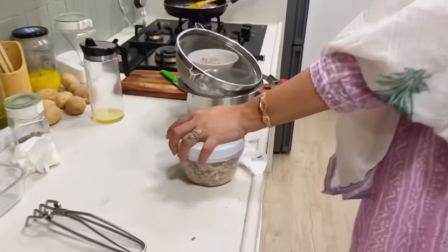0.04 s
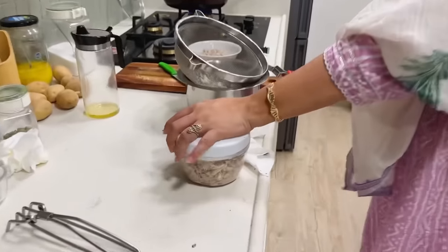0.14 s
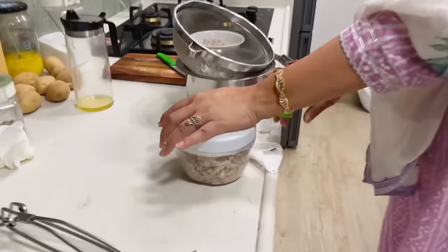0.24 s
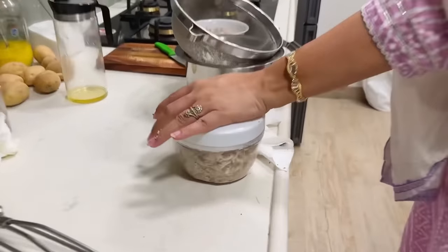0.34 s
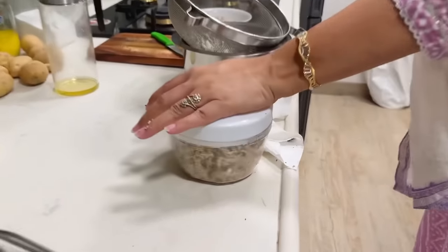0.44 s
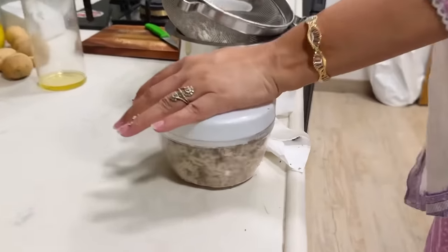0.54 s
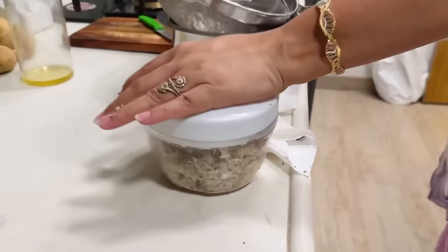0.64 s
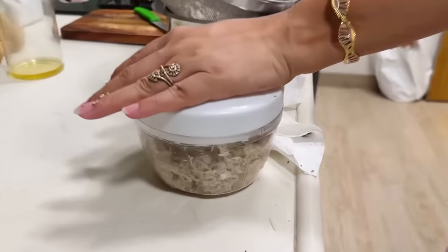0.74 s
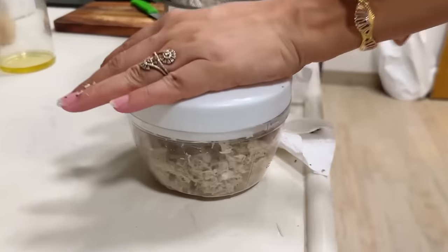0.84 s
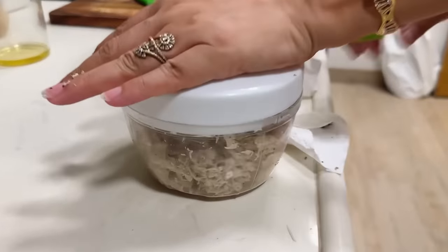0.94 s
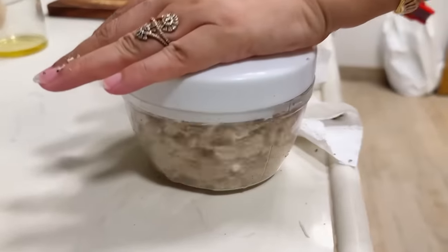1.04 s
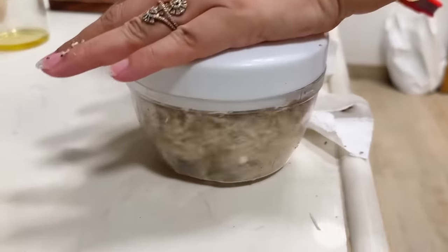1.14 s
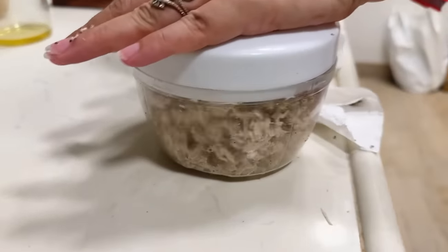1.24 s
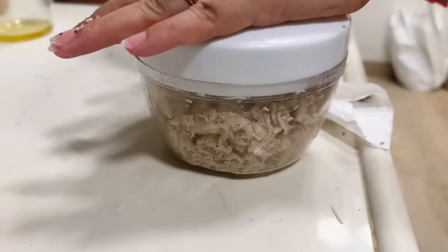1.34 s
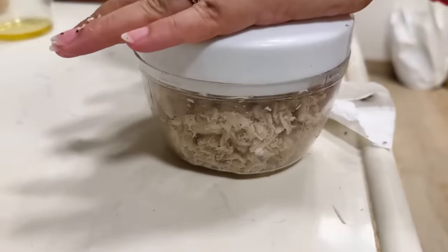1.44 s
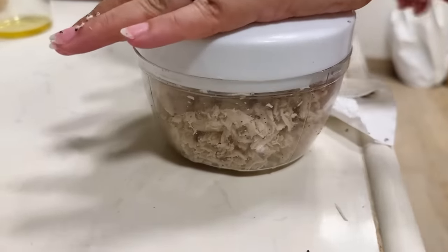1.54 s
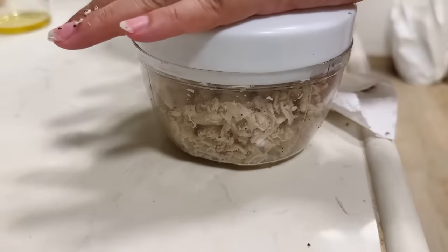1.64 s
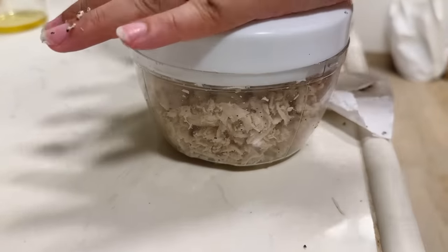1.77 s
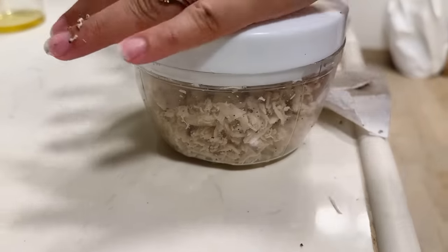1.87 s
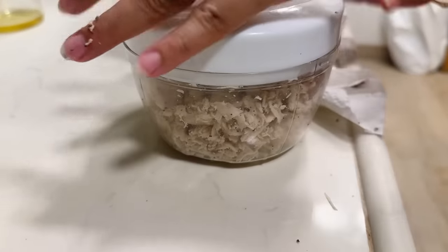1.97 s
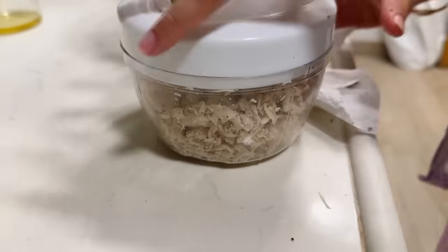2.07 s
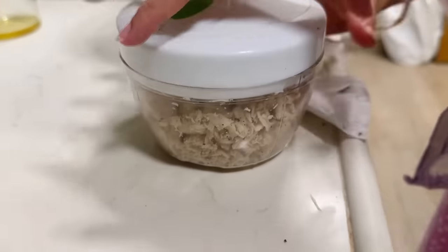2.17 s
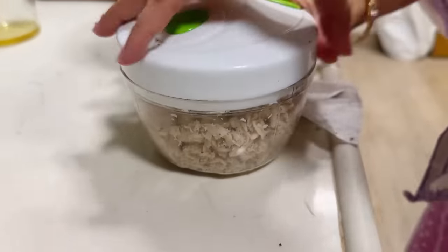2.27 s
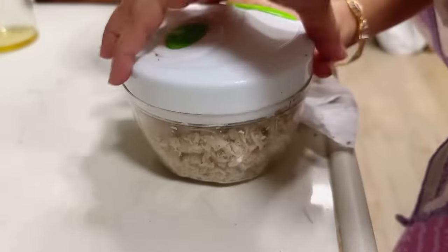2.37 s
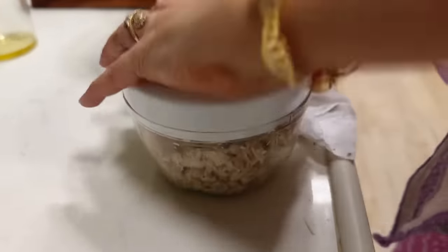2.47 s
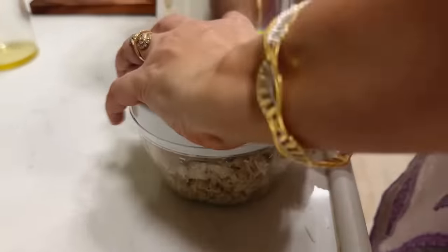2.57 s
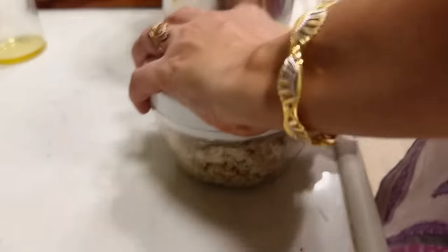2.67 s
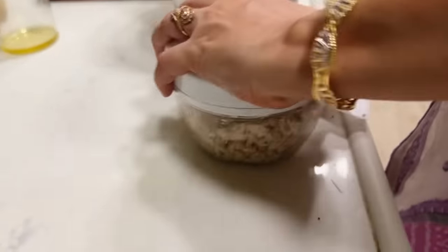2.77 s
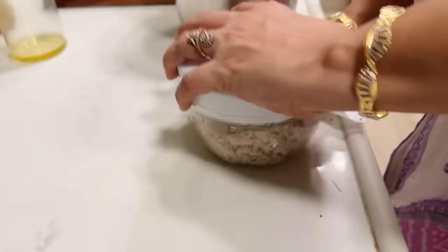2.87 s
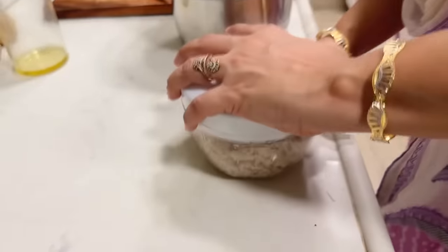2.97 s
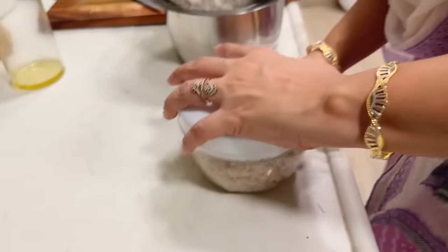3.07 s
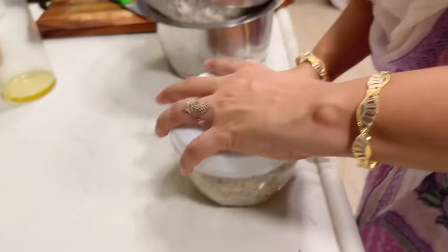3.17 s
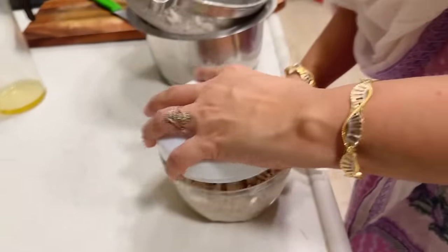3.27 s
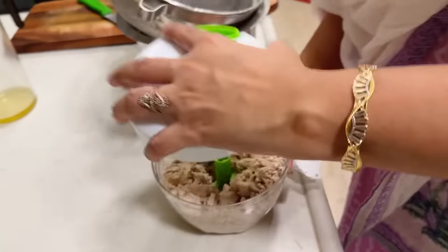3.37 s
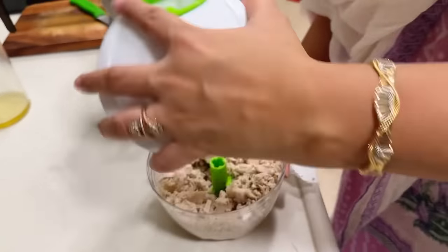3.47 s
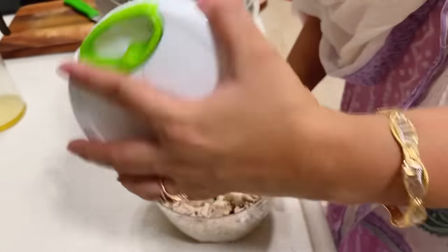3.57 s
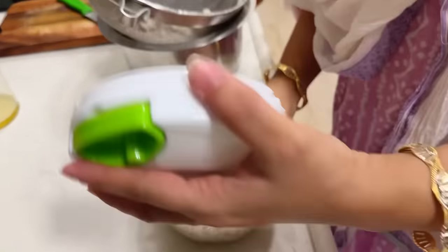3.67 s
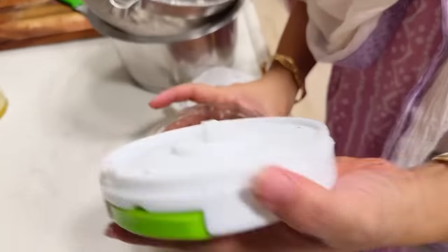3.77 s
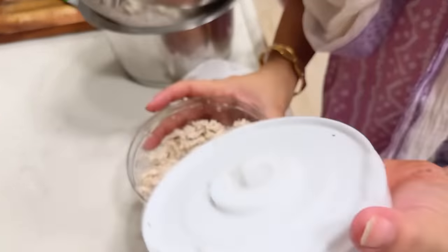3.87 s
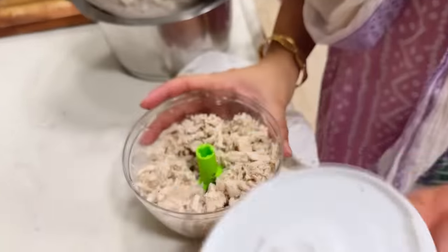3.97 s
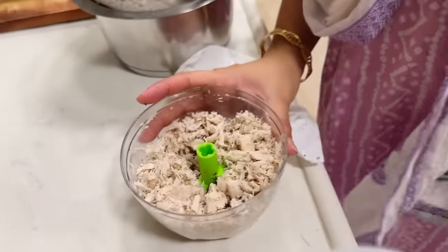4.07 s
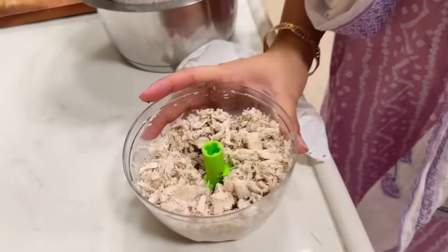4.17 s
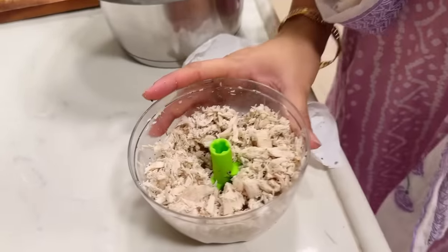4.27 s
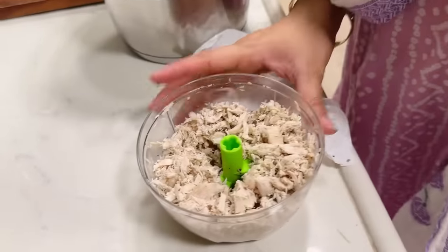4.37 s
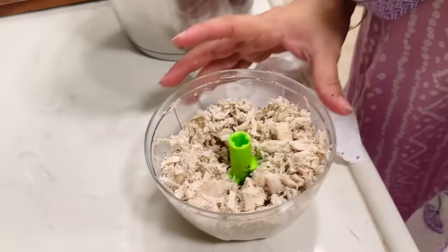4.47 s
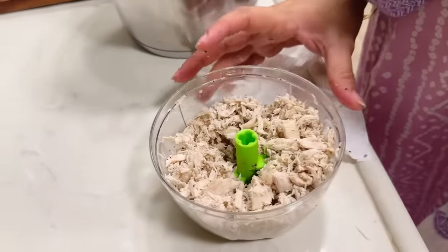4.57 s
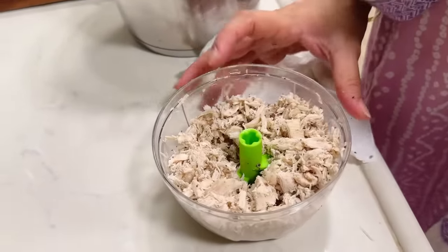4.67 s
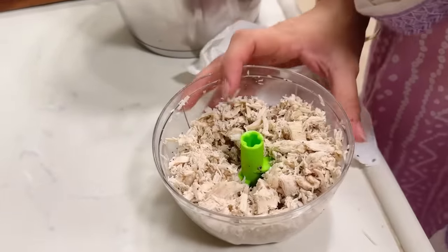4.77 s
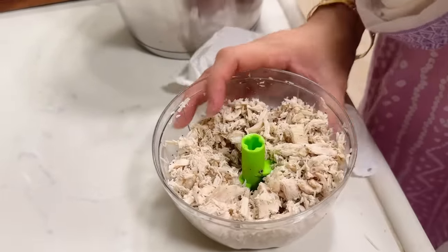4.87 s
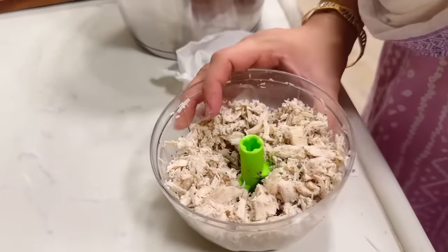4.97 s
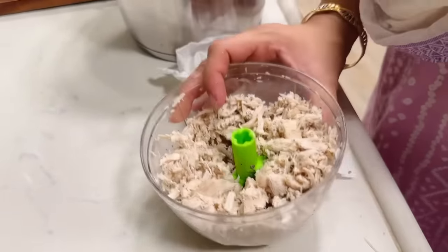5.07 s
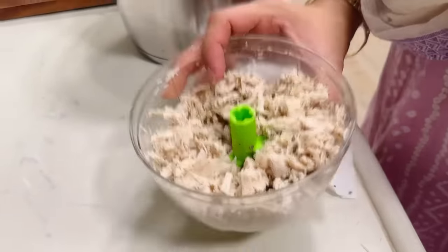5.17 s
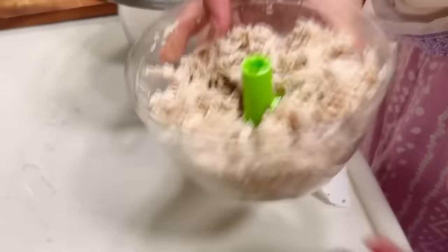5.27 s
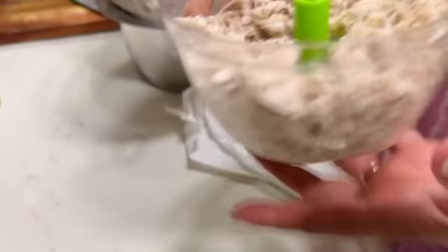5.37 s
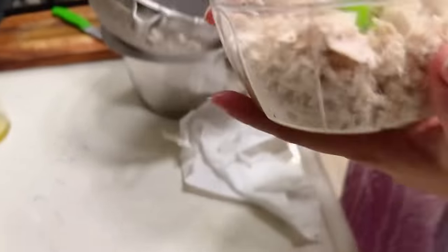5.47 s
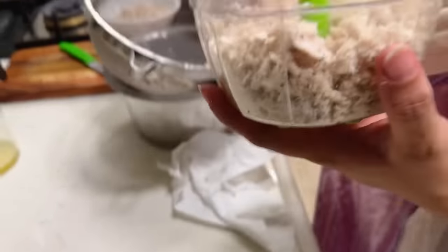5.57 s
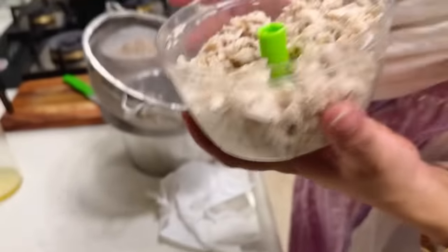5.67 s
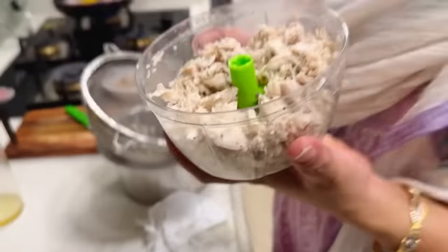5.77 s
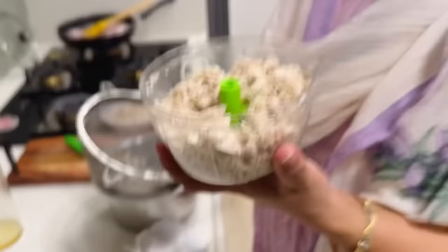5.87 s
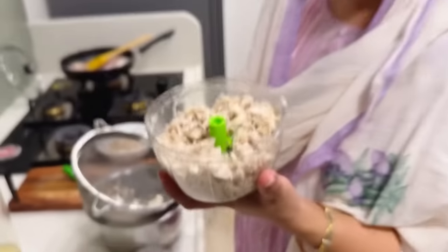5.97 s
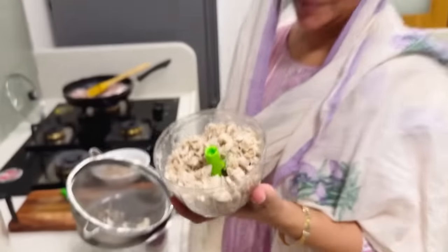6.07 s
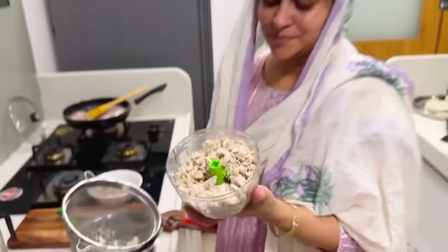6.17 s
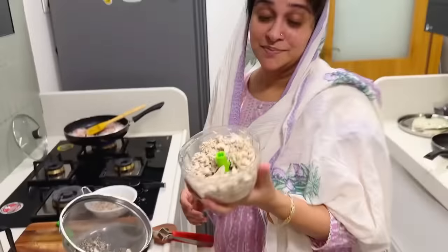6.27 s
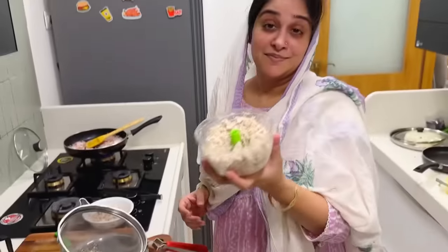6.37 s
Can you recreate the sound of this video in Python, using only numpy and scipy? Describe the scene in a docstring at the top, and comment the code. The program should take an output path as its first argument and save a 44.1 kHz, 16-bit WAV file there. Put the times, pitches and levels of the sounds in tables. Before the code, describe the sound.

Close to a phone microphone in a small, hard kitchen, a pull-cord plastic chopper shreds cooked chicken in three quick pulls. The cord rasps, the blades slap the meat and the spool rattles back, until the handle snaps home. The lid twists off with faint clicks and lands with a loud, hollow clack. The bowl knocks and drags on the counter, then clothes rustle softly over a faint appliance hum.

```python
"""A pull-cord plastic chopper shreds cooked chicken on a kitchen counter, close to a phone.
Three pulls spin the blades, which slap the meat; a spring rattles the cord back in, and at last the
handle snaps home. The lid is twisted off and put down with a hard clack, the bowl knocks and drags
as it is picked up, clothes rustle. An appliance hums faintly in the small, hard room."""
import sys
import numpy as np
from scipy import signal
from scipy.fft import rfft, irfft
from scipy.io import wavfile

SR = 44100
rng = np.random.default_rng(int(sys.argv[2]) if len(sys.argv) > 2 else 0)


def digitize_waveform(pressure):
    """Quantize a signal to 16-bit integers and store it at the path in sys.argv[1].

    Rows of a 2-D input are taken as channels; values are limited to [-1, 1].
    """
    field = np.atleast_2d(pressure).T
    bounded = np.clip(field, -1, 1)
    quanta = np.round(bounded * 32767).astype(np.int16)
    wavfile.write(sys.argv[1], SR, quanta)


N = 283286
T = np.arange(N) / SR
HIT_T = T[:SR // 3]
TOP_HZ = 16000

# cord pulls (start [s], run-up [s], meat level [dB], relative cord level [dB])
PULLS = [(-.02, 0.13, -36.5, -47), (0.593, 0.13, -34, -44.5), (1.275, 0.085, -30.5, -43.5)]
# shredding spectrum (frequency [Hz], gain [dB])
MEAT_SPECTRUM = [(50, -21), (120, -12.5), (220, 0.5), (350, 2), (700, -3.5), (1000, -11), (1400, 1),
                 (2200, -10), (3500, -21.5), (6000, -18), (10000, -39), (16000, -65)]
# housing resonances (frequency [Hz], width [Hz], gain [dB])
HOUSING_MODES = [(350, 50, 0), (506, 40, -3), (845, 160, 1), (1290, 140, -6), (1600, 380, 1.5),
                 (1980, 200, -3), (2375, 120, -3), (2970, 400, -4), (3700, 500, -3)]
# large chunks caught by a blade (time [s], level [dB], pitch [Hz])
CHUNKS = [(0.083, -32.5, 1220), (0.129, -39, 515), (0.712, -38, 394), (0.734, -34.5, 790),
          (1.252, -46, 745), (1.338, -29, 680), (1.347, -28.5, 960), (1.383, -30.5, 515),
          (1.46, -30.5, 605), (1.481, -37, 1240), (1.683, -42.5, 680)]
PULL_HOLD_S, COAST_DB_PER_S, MEAT_EXPONENT = 0.018, 102, 0.86


def chopping():
    """Blades tear through shreds of meat in quick flurries, fading as the meat slows them."""
    flurry = undb(2.5 * walk(150))
    shreds = (grains(500, spread_db=1) + 1.5 * grains(3000, spread_db=0)) * flurry
    meat = unit(body(colour(shreds, MEAT_SPECTRUM), HOUSING_MODES[:3]))
    out = np.zeros(N)
    for s, rise_s, meat_db, _ in PULLS:
        speed = spin(s, rise_s, PULL_HOLD_S, COAST_DB_PER_S)
        out += meat * undb(meat_db) * speed ** MEAT_EXPONENT + blades(speed, meat_db - 2)
    for s, db, hz in CHUNKS:
        add(out, s, blow(slap(hz), db))
    return out


def blades(speed, db, top_rate_hz=91.55, median_hz=623, spread_octaves=.75, jitter_s=.0012):
    """Each blade pass flings a piece of a different size against the bowl."""
    pass_count = np.cumsum(top_rate_hz * np.sqrt(speed)) / SR
    passes = np.flatnonzero(np.diff(np.floor(pass_count)))
    out = np.zeros(N)
    for i, (smallness, strength, lateness) in zip(passes, rng.standard_normal((64, 3))):
        hz = median_hz * 2 ** (spread_octaves * np.clip(smallness, -1.5, 2))
        hit = speed[i] ** MEAT_EXPONENT * blow(slap(hz), db + 3 * strength)
        add(out, max(i / SR + lateness * jitter_s, 0), hit)
    return out


def slap(hz, decay_cycles=2.1):
    """A wet, quickly damped blow on meat; smaller pieces sound higher."""
    return np.sin(2 * np.pi * hz * HIT_T) * np.exp(-HIT_T * hz / decay_cycles)


# cord rasp spectrum (frequency [Hz], gain [dB])
CORD_SPECTRUM = [(2500, -1), (4500, -4), (7000, -12), (9000, -8), (10400, -6), (16000, -10.5)]
# whistling bands of the taut cord (frequency [Hz], width [Hz], gain [dB])
CORD_BANDS = [(8130, 260, 10), (9700, 400, 12)]
# cord whips (time [s], level [dB])
WHIPS = [(0.908, -33), (1.076, -41), (1.328, -38)]


def pull_cord():
    """The cord rasps through its eyelet, louder with speed, and whips three times."""
    fibres = grains(9000, spread_db=1) * undb(2.5 * walk(180))
    rasp = unit(body(colour(fibres, CORD_SPECTRUM), CORD_BANDS)) * undb(6.5)
    out = np.zeros(N)
    for s, rise_s, _, db in PULLS:
        out += rasp * undb(db) * spin(s, rise_s, PULL_HOLD_S, COAST_DB_PER_S) ** 0.78
    for s, db in WHIPS:
        add(out, s, blow(band(contact(0.059, chatter=4.7), 9400, 2600), db))
    return out


# spindle glide (time [s], pitch [Hz], level [dB])
WHINE = [(1.275, 600, -52), (1.3, 820, -43), (1.33, 1130, -39), (1.365, 1330, -39), (1.41, 1040, -43),
         (1.47, 800, -50), (1.525, 630, -42), (1.56, 480, -56)]


def spindle_whine(roughness=0.06):
    """On the hardest pull the spindle sings hoarsely, rising then falling."""
    s, hz, db = np.transpose(WHINE)
    pitch_hz = np.interp(T, s, hz) * (1 + roughness * walk(400))
    gain = np.interp(T, s, undb(db), left=0, right=0) * undb(3.5 * walk(180))
    return np.sqrt(2) * np.sin(2 * np.pi * np.cumsum(pitch_hz) / SR) * gain


# spool rewinds (start [s], run-up [s], hold [s], level [dB])
REWINDS = [(.19, 0.27, 0.026, -35.5), (.87, 0.22, 0.031, -31), (1.53, 0.12, 0.068, -48)]
# spindle idling between pulls (start [s], length [s], level [dB])
IDLING = [(.5, 0.17, -59.5), (1.18, 0.15, -47)]
# spool scrape spectrum (frequency [Hz], gain [dB])
SPOOL_SPECTRUM = [(60, -0.5), (180, 4.5), (350, 5), (800, 2.5), (1500, -3), (2400, -3.5), (3500, -9.5),
                  (5000, -8), (8000, -11), (11000, -14.5), (16000, -21)]


def rewinding(tooth_hz=118, decay_teeth=0.9, brake_db_per_s=208):
    """The spring spins the spool back, its catch scraping unevenly over the teeth; the spindle idles."""
    tooth_phase = np.cumsum(tooth_hz * (1 + 0.051 * walk(65))) / SR % 1
    scrape = grains(3000, spread_db=0) * (2.1 + np.exp(-tooth_phase / decay_teeth))
    gain = sum(undb(db) * spin(s, rise_s, hold_s, brake_db_per_s) for s, rise_s, hold_s, db in REWINDS)
    idle = unit(colour(grains(4000, spread_db=1), SPOOL_SPECTRUM)) * rubs(IDLING)
    return unit(body(colour(scrape, SPOOL_SPECTRUM), HOUSING_MODES)) * gain + idle


# housing knocks (time [s], level [dB], chatter t60 [s], favoured tone [Hz], treble [dB])
KNOCKS = [(.277, -22.5, 0.067, 784, -4.5), (.312, -34.5, 0.033, 800, -14), (.396, -26, 0.099, 856, -10),
          (.409, -26.5, 0.17, 1300, -11), (0.459, -23.5, 0.028, 1200, 0.5), (0.475, -19.5, 0.012, 810, -5),
          (.481, -24, 0.087, 1710, -5), (.628, -39, 0.099, 1347, -11), (0.904, -32, 0.03, 900, -9),
          (0.9079, -21, 0.035, 510, -7), (.911, -18.5, 0.043, 1670, -2.5), (1.011, -32, 0.015, 1000, -6),
          (1.028, -24.5, 0.033, 840, -16), (1.032, -19, 0.11, 1320, 1.5), (1.063, -30, 0.025, 870, -10),
          (1.1, -23.5, 0.066, 1600, -3), (1.1157, -18.5, 0.012, 990, -1), (1.1301, -16.5, 0.048, 1570, -10),
          (1.173, -32, 0.032, 850, -7), (1.269, -39, 0.049, 1752, -27), (2.093, -48.5, 0.018, 1420, 15),
          (2.246, -51, 0.012, 1300, 1), (4.446, -48.5, 0.038, 1350, -1)]
# knock spectrum (frequency [Hz], gain [dB])
KNOCK_SPECTRUM = [(60, -28), (200, -15), (400, -3), (800, 0), (1400, 0), (2200, -1), (3300, -8),
                  (4200, -14), (5000, -19), (9000, -22), (16000, -30)]
# dry cracks of the hardest knocks (time [s], level [dB])
CRACKS = [(.475, -35), (1.0325, -31), (1.1149, -27), (1.1294, -28)]
# crack spectrum (frequency [Hz], gain [dB])
CRACK_SPECTRUM = [(500, -16), (1100, -4), (1650, 2), (2400, -2), (3200, -3), (4000, -4), (5000, -18),
                  (16000, -28)]


def knocks(scatter_db=6, tone_db=3.5):
    """Spool, catch and lid strike the housing; each lands elsewhere and wakes its modes differently."""
    out = np.zeros(N)
    for s, db, t60_s, tone_hz, treble_db in KNOCKS:
        modes = [(hz, width_hz, mode_db + scatter_db * rng.standard_normal())
                 for hz, width_hz, mode_db in HOUSING_MODES]
        push = colour(contact(t60_s, chatter=6.2), KNOCK_SPECTRUM)
        push = colour(push, [(1800, 0), (4000, treble_db)])
        push = body(push, [(tone_hz, tone_hz / 2, tone_db)])
        add(out, s, blow(body(push, modes), db))
    for s, db in CRACKS:
        add(out, s, blow(colour(contact(0.0032, chatter=1), CRACK_SPECTRUM), db))
    return out


# handle impacts (time [s], level [dB], spring level [dB], top treble [dB])
SNAPS = [(1.7405, -20.5, -48, -17), (1.7542, -14.5, -36, -2), (1.7628, -15.5, -37, 3),
         (1.7664, -16, -29, 8), (1.7769, -17.5, -30, -13)]
# impact spectrum (frequency [Hz], gain [dB])
SNAP_SPECTRUM = [(60, -22), (170, -7.5), (400, 0), (700, 2), (1300, .5), (2000, .5), (3000, -5),
                 (5000, -11.5), (8000, -11.5), (16000, -19)]
# handle resonances (frequency [Hz], width [Hz], gain [dB])
HANDLE_MODES = [(506, 30, -2), (1260, 45, -1), (1590, 50, -1), (1805, 40, 0), (1954, 40, -1), (4860, 60, 1),
                (5210, 60, 2), (5502, 120, -4), (6718, 120, -3), (7122, 70, 1)]
# coil spring resonances (frequency [Hz], width [Hz], gain [dB])
SPRING_MODES = [(2272, 120, -7), (3451, 250, -6), (4296, 200, -7), (4870, 80, 1), (5210, 120, -1),
                (5507, 250, -5), (6385, 120, -3), (6760, 160, -2), (7122, 120, -2), (8290, 200, -7),
                (10200, 700, -11)]


def handle_snap(shiver_t60_s=0.31):
    """The handle flies home, rattles in its own bright modes and sets the spring shivering."""
    out = np.zeros(N)
    for s, db, spring_db, top_db in SNAPS:
        rattle = colour(contact(.036, chatter=3), [(7000, 0), (13000, top_db)])
        add(out, s, blow(body(colour(rattle, SNAP_SPECTRUM), HANDLE_MODES), db))
        shiver = contact(shiver_t60_s, chatter=4.3)
        add(out, s, blow(resonances(shiver, SPRING_MODES), spring_db))
    return out


# lid twists (start [s], length [s], level [dB])
TWISTS = [(2.738, 0.093, -56), (2.835, .05, -57)]
# lug jumps (time [s], click level [dB], thud level [dB])
LUGS = [(2.7868, -43, -44), (2.852, -47, -52), (2.8588, -38, -46.5)]
# lug click spectrum (frequency [Hz], gain [dB])
LUG_SPECTRUM = [(100, -10), (350, -11), (700, 5), (1200, 2), (1900, -1), (2600, -4), (3600, -12),
                (5000, -22), (16000, -24)]


def lid_twist(scrape_hz=1150, thud_hz=95):
    """The lid scrapes round the rim; each lug clicks over its notch and jolts the bowl on the counter."""
    out = unit(steep_band(grains(700, spread_db=0), scrape_hz, 130)) * rubs(TWISTS)
    for s, click_db, thud_db in LUGS:
        add(out, s, blow(colour(contact(0.021, chatter=2.5), LUG_SPECTRUM), click_db))
        add(out, s, blow(steep_band(contact(.1, chatter=2), thud_hz, 40), thud_db))
    return out


# lid and bowl landings
# (time [s], thump [dB], pitch [Hz], clack [dB], click [dB], click pitch [Hz], thump lag [s])
BUMPS = [(3.271, -34.5, 560, -48, -67, 5500, 0.00096), (3.568, -41, 354, -57, -68, 5500, 0.00076),
         (4.5055, 1.5, 475, -18.5, -29.5, 8600, 0.00049), (4.678, -28, 332, -50, -61, 5500, 0.0035),
         (4.857, -16.5, 382, -36.5, -42.5, 5700, 0.0027), (4.8839, -24, 350, -35, -52, 5500, 0.0053),
         (4.9481, -20, 357, -34.5, -39, 6000, 0.0014), (4.9826, -17.5, 410, -32, -63, 5500, 0.0045),
         (5.026, -29, 433, -50, -67, 5500, 0.0012), (5.4358, -33.5, 926, -54, -62, 5500, 0.00083)]
# clack spectrum (frequency [Hz], gain [dB])
CLACK_SPECTRUM = [(100, -22), (300, -8), (700, -1), (1100, 3), (1600, -1), (2150, -7), (2700, -2),
                  (3400, -11), (4100, -17), (5000, -28), (16000, -50)]
# click spectrum (frequency [Hz], gain [dB])
CLICK_SPECTRUM = [(1000, -51), (2800, -25), (4200, 7), (5200, 5), (7000, 8), (8600, 3.5), (11000, 3),
                  (14000, 5.5)]
# hollow lid modes (frequency [Hz], level [dB], t60 [s])
LID_MODES = [(509.7, -23.5, 0.25), (560, -33, .15)]


def counter_bumps(rock_s=.011, rock_max_db=-26, lid_down_s=4.506):
    """Plastic on stone: click, clack, thump, then a softer thump as it rocks level; the lid rings on."""
    out = np.zeros(N)
    for s, db, pitch_hz, clack_db, click_db, click_hz, lag_s in BUMPS:
        add(out, s + lag_s, undb(db) * thump(pitch_hz))
        add(out, s + lag_s + rock_s, undb(min(db - 5, rock_max_db)) * thump(pitch_hz * .85))
        add(out, s, blow(colour(contact(0.076, chatter=1.5), CLACK_SPECTRUM), clack_db))
        click = colour(contact(.03, chatter=3), CLICK_SPECTRUM)
        add(out, s, blow(body(click, [(click_hz, click_hz / 3, 3)]), click_db))
    for hz, db, t60_s in LID_MODES:
        add(out, lid_down_s, undb(db) * np.sin(2 * np.pi * hz * HIT_T) * decay(t60_s))
    return out


# struck plastic modes (frequency [x pitch], gain [dB], t60 [s])
THUMP_MODES = [(.56, -27, .04), (1, 0, .028), (1.1, -7, .028), (1.045, -29, .15), (1.35, -29, .04),
               (1.95, -17, .012), (2.3, -14, .016), (3.2, -25, .025)]


def thump(pitch_hz, stiffening=1.2, contact_s=0.0008, rise_s=0.0011):
    """The hollow ring of struck plastic, starting sharp while the contact is stiff."""
    warped_s = HIT_T + stiffening * contact_s * (1 - np.exp(-HIT_T / contact_s))
    ring = sum(undb(db) * np.sin(2 * np.pi * ratio * pitch_hz * warped_s) * decay(t60_s)
               for ratio, db, t60_s in THUMP_MODES)
    return ring * (1 - np.exp(-HIT_T / rise_s))


# lid slides and clothes rustles (start [s], length [s], level [dB])
BRUSHES = [(2.99, 0.29, -48), (3.8, 0.057, -52), (4.05, 0.076, -52.5), (6.1, 0.14, -51), (6.23, 0.11, -42),
           (6.31, 0.2, -43.5)]
# brushing spectrum (frequency [Hz], gain [dB])
BRUSH_SPECTRUM = [(200, -15), (700, 1), (2400, 2), (4500, -1), (8500, 0), (16000, -5)]


def brushing():
    """Fine friction: the lid slides on the rim, clothes brush."""
    friction = unit(colour(grains(9000, spread_db=1), BRUSH_SPECTRUM))
    return friction * undb(1.2 * walk(40)) * rubs(BRUSHES)


# bowl drags (start [s], length [s], level [dB])
DRAGS = [(2.49, 0.087, -49.5), (2.8, 0.1, -55.5), (3.18, 0.087, -47), (4.835, 0.064, -38.5),
         (4.95, 0.11, -42), (5.06, 0.069, -53.5)]
# judder spectrum (frequency [Hz], gain [dB])
DRAG_SPECTRUM = [(60, -13), (150, -1), (300, 1), (520, 1), (850, -14), (1400, -12.5), (3000, -28),
                 (16000, -98)]


def bowl_drag():
    """The bowl's foot judders over the counter."""
    return unit(colour(grains(700, spread_db=1.5), DRAG_SPECTRUM)) * rubs(DRAGS)


# finger squeaks (start [s], length [s], level [dB])
SQUEAKS = [(4.13, 0.09, -58), (5.21, 0.097, -53.5), (5.54, 0.57, -61)]
# squeak tones (frequency [Hz], width [Hz], gain [dB])
SQUEAK_BANDS = [(1190, 170, -13), (1520, 160, -0.5), (2363, 150, -7)]


def finger_squeaks():
    """Fingers slip unevenly on the plastic and squeak faintly."""
    slips = grains(900, spread_db=6)
    squeak = sum(undb(db) * steep_band(slips, hz, width_hz) for hz, width_hz, db in SQUEAK_BANDS)
    return unit(squeak) * rubs(SQUEAKS)


# small ticks (time [s], level [dB], pitch [Hz])
TICKS = [(2.094, -55, 4300), (2.336, -49, 6500), (2.747, -46.5, 9200), (3.251, -49, 3360),
         (3.369, -49, 13700), (4.119, -44, 14300), (4.2225, -41.5, 1440), (4.817, -42, 1400),
         (5.391, -46, 6040), (5.54, -44.5, 8450)]


def ticks():
    """The lid makes light, bright ticks."""
    out = np.zeros(N)
    for s, db, hz in TICKS:
        add(out, s, blow(steep_band(contact(0.15, chatter=1.7), hz, hz / 2), db))
    return out


# kitchen air spectrum (frequency [Hz], gain [dB])
AIR_SPECTRUM = [(20, 1.5), (40, -1.5), (65, 4), (100, 1), (160, -6), (280, -5), (500, -13), (900, -15.5),
                (1300, -12.5), (2000, -18.5), (4000, -21.5), (16000, -34)]
# microphone hiss spectrum (frequency [Hz], gain [dB])
HISS_SPECTRUM = [(1000, -10), (4000, -2.5), (7200, 3.5), (10000, -2.5), (16000, -4.5)]


def background(air_db=-52, hum_db=-60, hum_hz=65, hiss_db=-55):
    """Kitchen air, partly different in each port, a wavering appliance drone and a fine hiss."""
    mid, side = (unit(colour(rng.standard_normal(N), AIR_SPECTRUM)) * undb(1.2 * walk(2.4))
                 for _ in range(2))
    side = colour(side, [(40, -40), (80, -3), (150, 8.5), (400, -2), (1500, 0.5), (15000, 2)])
    hum = unit(steep_band(rng.standard_normal(N), hum_hz, 5.6))
    hiss = [undb(hiss_db) * unit(colour(rng.standard_normal(N), HISS_SPECTRUM)) for _ in range(2)]
    mid = undb(air_db) * mid + undb(hum_db) * hum + hiss[0]
    side = undb(air_db) * side + undb(-0.5) * hiss[1]
    return np.array([mid + side, mid - side])


# wall reflection (frequency [Hz], gain [dB])
WALL_SPECTRUM = [(600, 1.5), (1500, -17), (6000, -2)]


def wall_echoes(x):
    """The direct sound plus two dulled echoes from the nearest walls."""
    dulled = colour(x, WALL_SPECTRUM)
    return x + sum(undb(db) * np.interp(T - delay_s, T, dulled)
                   for delay_s, db in [(.0156, -13), (.0335, -17)])


# room decay (frequency [Hz], t60 [s])
ROOM_T60 = [(100, .33), (500, .35), (2000, .31), (6000, .3), (16000, .2)]
# reverberation spectrum (frequency [Hz], gain [dB])
ROOM_SPECTRUM = [(60, -12), (300, -10), (600, -8), (1500, -5), (4000, -6), (8000, -5), (16000, -8)]


def room(x):
    """The diffuse ring of a small hard kitchen; the treble dies first."""
    t = T[:SR // 2]
    hz = np.fft.rfftfreq(len(t), 1 / SR)
    edges_hz = np.append(0, np.geomspace(TOP_HZ / 64, TOP_HZ, num=7))
    noise = np.exp(2j * np.pi * rng.random(len(hz)))
    tail = sum(irfft(noise * ((hz >= lo) & (hz < hi)), len(t)) * decay(read(ROOM_T60, (lo + hi) / 2), t)
               for lo, hi in zip(edges_hz, edges_hz[1:]))
    tail *= 1 - np.exp(-t / 0.00046)
    return signal.fftconvolve(x, colour(tail / np.linalg.norm(tail), ROOM_SPECTRUM))[:N]


# microphone port response (frequency [Hz], gain [dB])
PORT_RESPONSE = [(3000, 1), (4200, 1), (6300, 2), (9000, 4.5), (11000, -7), (13500, 2)]
# left port over right (frequency [Hz], difference [dB])
LEFT_BIAS = [(100, 1.5), (380, 3.5), (800, 4.5), (1500, 0), (2400, 1), (4400, 1), (8000, 0)]


def ports(x, wet_db, turn_hz):
    """Two ports face different sides of the plastic, so tones near turn_hz arrive out of phase."""
    x = colour(x, PORT_RESPONSE)
    left = colour(x, [(hz, db / 2) for hz, db in LEFT_BIAS])
    turned = x - 2 * band(x, turn_hz, turn_hz / 3)
    right = colour(turned, [(hz, -db / 2) for hz, db in LEFT_BIAS])
    return np.array([side + undb(wet_db) * room(side) for side in (left, right)])


# phone's lean to the left (frequency [Hz], difference [dB])
PHONE_LEAN = [(4000, 0), (6300, 3), (7500, 4), (8700, 0)]


def phone_stereo(x, right_lag_s=.00003, shared_hz=8230, turn_hz=11300):
    """The right side lags; the top treble is one signal for both sides, out of phase in one band."""
    hz = np.fft.rfftfreq(N, 1 / SR)
    left, right = rfft(x)
    shared = 1 / (1 + (shared_hz / (hz + 1)) ** 20)
    lagged = right * np.exp(-2j * np.pi * hz * right_lag_s)
    right = (1 - shared) ** .5 * lagged + shared ** .5 * left
    lean = undb(read(PHONE_LEAN, hz) / 2)
    left, right = irfft(left * lean, N), irfft(right / lean, N)
    return np.array([left, right - 2 * band(right, turn_hz, 3500)])


def spin(start_s, rise_s, hold_s, fall_db_per_s):
    """Speed, 0 to 1: a smooth run-up, a hold, then friction slows it."""
    t = T - start_s
    run_up = np.sin(np.pi / 2 * np.clip(t / rise_s, 0, 1)) ** 2
    return run_up * undb(-fall_db_per_s * np.maximum(t - rise_s - hold_s, 0))


def rubs(rows):
    """Gain of short movements, one arch each."""
    return sum(undb(db) * np.abs(np.sin(np.pi * np.clip((T - s) / length_s, 0, 1))) ** 0.64
               for s, length_s, db in rows)


def contact(t60_s, chatter):
    """One sharp push, then a fading buzz of parts against each other."""
    buzz = rng.standard_normal(len(HIT_T)) * decay(t60_s)
    return chatter * buzz / np.linalg.norm(buzz) + (HIT_T == 0)


def grains(rate_hz, spread_db):
    """Random tiny impacts of unequal size."""
    impacts = (rng.random(N) < rate_hz / SR) * rng.standard_normal(N)
    return unit(impacts * undb(spread_db * rng.exponential(size=N).clip(0, 3)))


def walk(rate_hz):
    """Smooth random wander, spread near 1."""
    steps = rng.standard_normal(N // 10)
    return np.interp(T * rate_hz, np.arange(len(steps)), steps)


def decay(t60_s, t=HIT_T):
    """Fall of 60 dB per t60_s."""
    return np.exp(-np.log(1000) * t / t60_s)


def band(x, hz, width_hz):
    """One resonance, gain 1 at its centre."""
    return signal.lfilter(*signal.iirpeak(min(hz, TOP_HZ), hz / width_hz, fs=SR), x)


def steep_band(x, hz, width_hz):
    """One resonance applied twice."""
    return band(band(x, hz, width_hz), hz, width_hz)


def resonances(x, modes):
    """Modes in parallel."""
    return sum(undb(db) * band(x, hz, width_hz) for hz, width_hz, db in modes)


def body(x, modes):
    """The push plus the resonances it wakes."""
    return x + resonances(x, modes)


def colour(x, spectrum, size=2048):
    """Minimum-phase filter with the given spectrum."""
    cepstrum = irfft(np.log(undb(read(spectrum, np.fft.rfftfreq(size, 1 / SR)))))
    cepstrum[1:size // 2] *= 2
    response = irfft(np.exp(rfft(cepstrum[:size // 2], size)))
    return signal.fftconvolve(x, response)[:len(x)]


def read(points, hz):
    """Read a table on a log-frequency axis."""
    points_hz, values = np.transpose(points)
    return np.interp(np.log(hz + 1), np.log(points_hz), values)


def undb(db):
    """Decibels to gain."""
    return 10 ** (np.asarray(db) / 20)


def unit(x):
    """Scale to rms 1."""
    return x / np.sqrt(np.mean(x ** 2))


def blow(x, db):
    """Scale a hit to db as if all its energy fell in 10 ms."""
    return x * undb(db) * np.sqrt(SR / 100 / np.sum(x ** 2))


def add(out, s, x):
    """Mix x into out from time s."""
    i = int(s * SR)
    out[i:i + len(x)] += x[:N - i]


def scene():
    """The chopper in front of the phone; bumps on the counter also echo off the nearest walls."""
    chopper = chopping() + pull_cord() + spindle_whine() + rewinding()
    handling = brushing() + bowl_drag() + finger_squeaks()
    rubbing = ports(chopper + handling, wet_db=0, turn_hz=1430)
    hits = ports(knocks() + handle_snap() + ticks() + lid_twist(), wet_db=-3, turn_hz=1750)
    bumps = ports(wall_echoes(counter_bumps()), wet_db=-6, turn_hz=3200)
    return rubbing + hits + bumps + background()


def record(dry):
    """The phone shapes the stereo image, sheds rumble, rounds the loudest peaks and cuts the top."""
    x = signal.sosfilt(signal.butter(3, 47, "high", fs=SR, output="sos"), phone_stereo(dry))
    rounded = np.tanh(.9 * x) / .9
    return signal.sosfilt(signal.ellip(10, .2, 80, TOP_HZ, fs=SR, output="sos"), rounded)


dry = scene()
out = record(dry)
digitize_waveform(out)
```